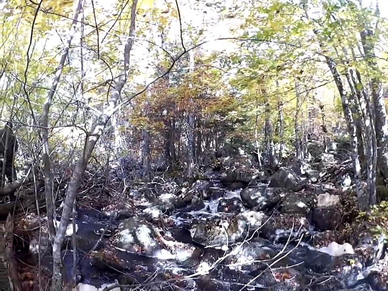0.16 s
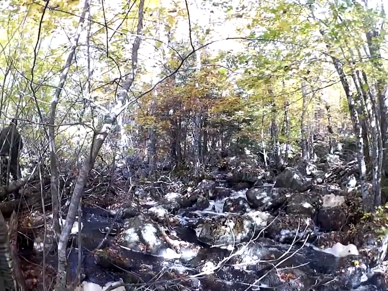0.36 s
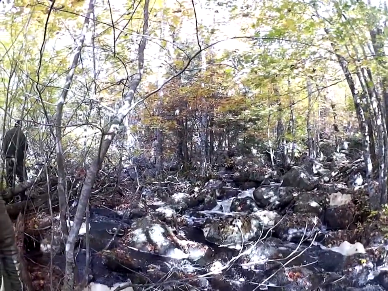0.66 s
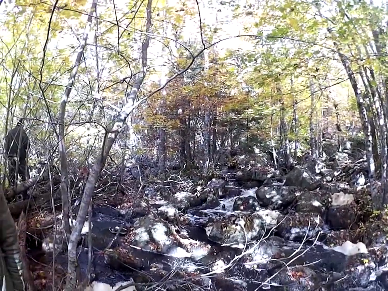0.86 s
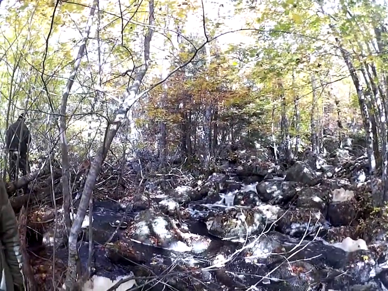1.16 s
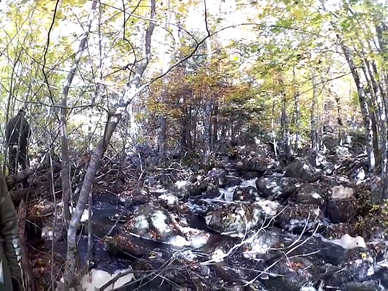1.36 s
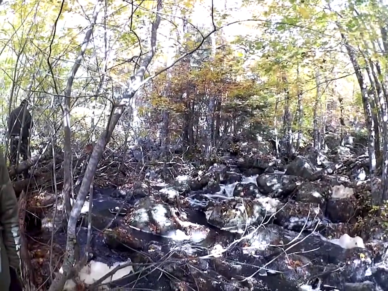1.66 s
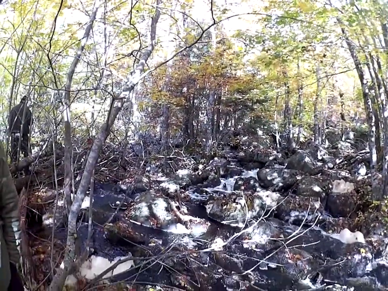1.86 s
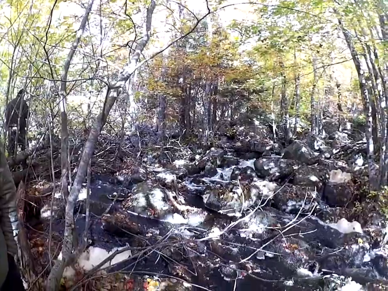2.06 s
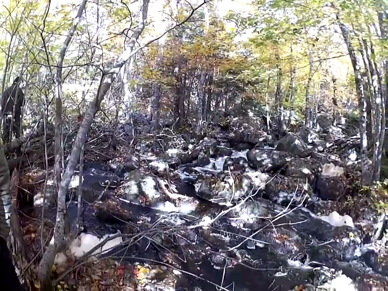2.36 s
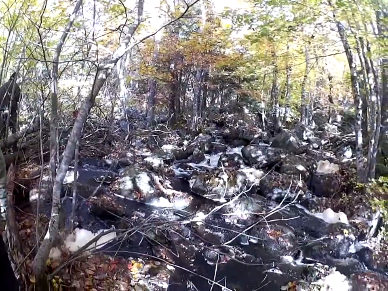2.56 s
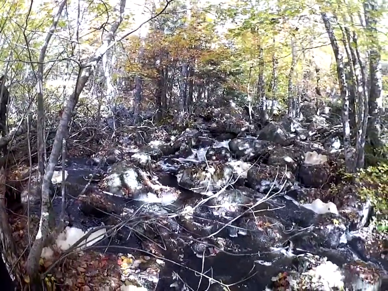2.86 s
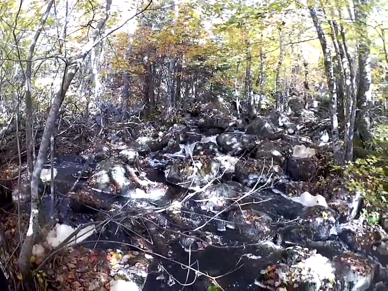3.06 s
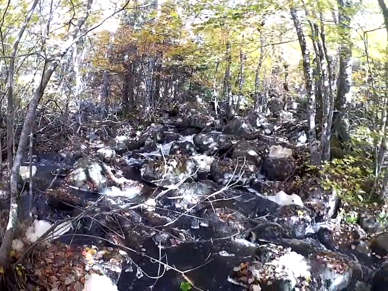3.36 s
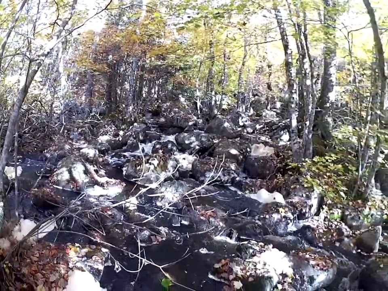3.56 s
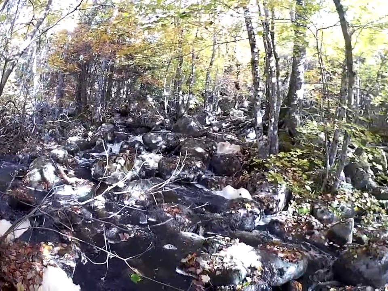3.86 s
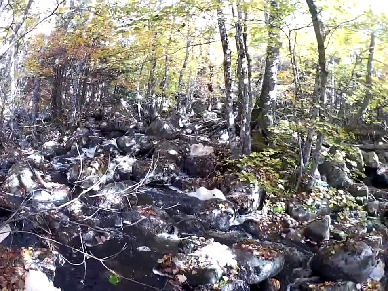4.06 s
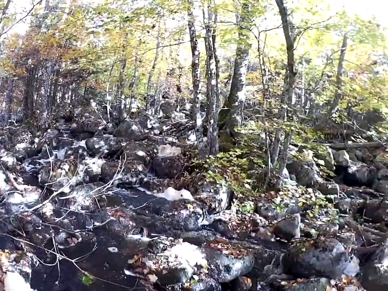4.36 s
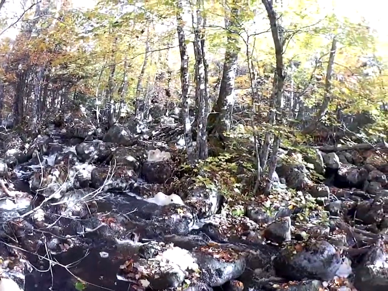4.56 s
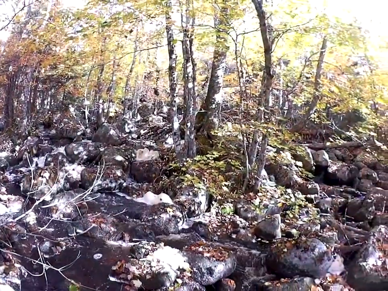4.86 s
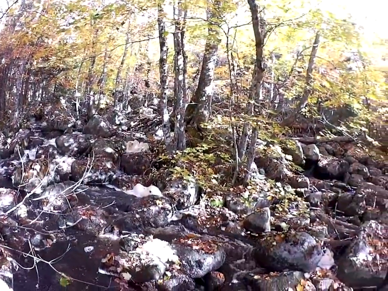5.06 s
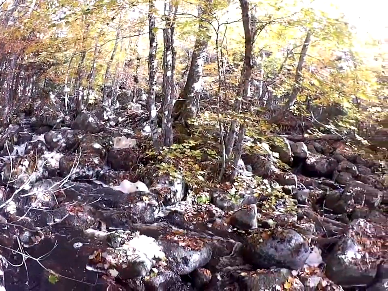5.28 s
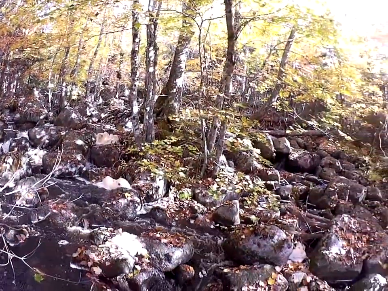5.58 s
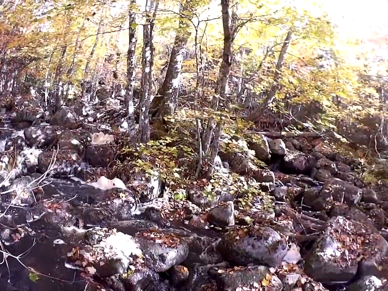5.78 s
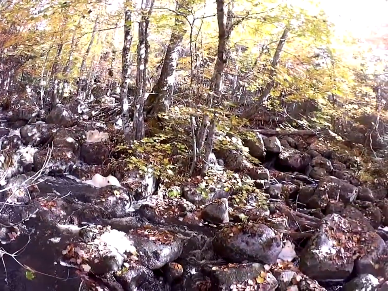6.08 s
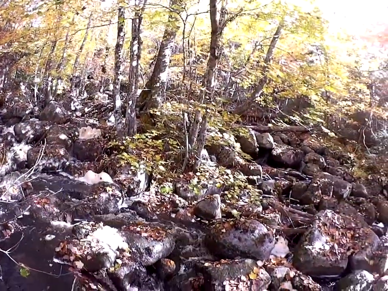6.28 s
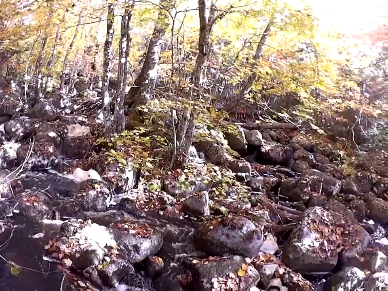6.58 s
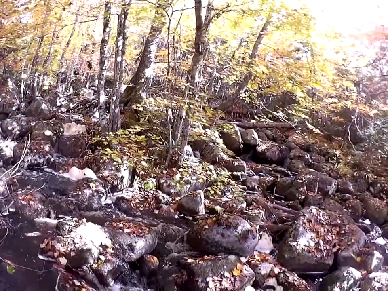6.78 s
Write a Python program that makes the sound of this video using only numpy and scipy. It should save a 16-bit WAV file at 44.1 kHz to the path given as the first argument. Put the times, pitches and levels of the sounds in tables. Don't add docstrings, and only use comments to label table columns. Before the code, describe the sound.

Unbroken watery rush outdoors, midrange-heavy and slightly boxy, with little deep rumble and softened top treble. It flickers quickly with crowded bubbles. Brief liquid plinks and lower plops scatter over it, more often in the second half. The closely spaced stereo pickup pans right past a boulder, briefly hollowing the lower rush; the cascade moves leftward. Nothing else is heard.

```python
import sys
import numpy as np
from scipy import signal
from scipy.fft import rfft, irfft, next_fast_len
from scipy.io import wavfile
from scipy.ndimage import map_coordinates

SR = 44100
rng = np.random.default_rng(int(sys.argv[2]) if len(sys.argv) > 2 else 0)


def waveform_to_disk(signal):
    frames = np.transpose(np.atleast_2d(signal))
    scaled = np.clip(frames, -1, 1) * 32767
    samples = np.round(scaled).astype(np.int16)
    wavfile.write(sys.argv[1], SR, samples)


def voltage_ratio(level):
    return 10 ** (np.asarray(level, float) / 20)


N = 305172
PAD = next_fast_len(N + 8192)

# [bearing to the left of the main cascade/rad, level/dB]
FALLS = [(0, 0), (-.38, -3.5), (.47, -3.5), (-.9, -5.5), (1.05, -5.5), (-1.6, -8), (1.9, -8), (-2.4, -8),
         (2.8, -8)]
# [f/Hz, level per Hz/dB]
RUSH_COLOUR = [(30, -7), (70, -9), (250, -3.5), (500, -4.5), (1000, 1.6), (2300, -0.28), (3200, -5.),
               (4800, -15), (5700, -17), (7000, -10.5), (9000, -10), (10500, -11), (12000, -20.5),
               (14000, -28)]
# [t/s, peak level/dB, f/Hz]
SPLASHES = [(0.2663, -16, 2330), (1.0585, -14, 2427), (1.1957, -11, 2370), (3.043, -23, 2300),
            (3.1323, -14, 2120), (3.2954, -12, 2190), (3.7219, -19, 2153), (3.7755, -16, 2310),
            (3.889, -14, 2390), (4.1709, -15, 2420), (4.306, -17, 2100), (4.4526, -9.5, 1910),
            (4.5543, -18, 2400), (4.892, -18, 2470), (5.633, -14, 2264), (5.9389, -13.5, 2430),
            (6.0706, -16, 2124), (6.3016, -18, 2394), (6.4657, -15, 2440), (6.6488, -23, 2180)]
# [t/s, peak level/dB, f/Hz]
PLOPS = [(0.244, -18, 975), (0.424, -19, 1090), (2.277, -26.5, 1450), (2.84, -22.5, 1390),
         (3.394, -26, 1117), (3.906, -23.5, 1100), (4.132, -17, 1050), (4.869, -15, 1100),
         (5.441, -17, 1076), (5.545, -16, 1103), (6.03, -28, 430), (6.07, -21.5, 1090), (6.285, -16, 928),
         (6.379, -19.5, 1096)]
# [t/s, peak level/dB, f/Hz]
TICKS = [
    (.640, -37, 4800),
    (1.661, -49.5, 5000),
    (3.111, -36, 6500),
    (3.401, -35, 4000),
    (4.567, -45, 5500),
    (5.709, -40.5, 11500),
    (6.024, -42, 5500),
]
# [cavity f/Hz, cavity Q, duct f/Hz, duct Q, level/dB]
PORTS = [
    (2295, 6.0, 8330, 8.2, -0.9),
    (2400, 4.0, 9770, 3.6, 1.2),
]


def rms_one(x):
    return x / np.sqrt(np.mean(x ** 2) + 1e-20)


def drift(rate):
    radius = np.exp(-80 * np.pi * rate / SR)
    chance = rng.standard_normal(N // 40 + 2002)
    slow = signal.lfilter([1], [1, -2 * radius, radius * radius], chance)[2000:]
    return np.interp(np.arange(N) / 40, np.arange(len(slow)), rms_one(slow))


def glide(span_s):
    return np.interp(np.arange(N) / SR, span_s, [0, 1])


def through(x, response):
    hz = np.arange(PAD // 2 + 1) * SR / PAD + 1e-3
    return irfft(rfft(x, PAD) * response(hz), PAD)[..., :N]


def read_late(x, seconds):
    return map_coordinates(x, [np.arange(N) - seconds * SR], order=3, mode="mirror")


def arrive(sources):
    spacing_m, sound_speed = 0.034, 343
    shadow_db, left_lift_db, shadow_hz = [4.5, -0.3], 0.63, 700
    clear, shaded = np.zeros((2, 2, N))
    for right, bearing in sources:
        leftness = np.sin(bearing)
        left = read_late(right, -leftness * spacing_m / sound_speed)
        both = np.array([left, right])
        gain_db = np.outer(shadow_db, leftness) + [[left_lift_db], [0]]
        clear += both
        shaded += both * (voltage_ratio(gain_db) - 1)
    return clear + through(shaded, lambda hz: 1j * hz / (shadow_hz + 1j * hz))


def boulder_echo():
    passed_s, span_s = 4.4, 0.65
    near = np.exp(-((np.arange(N) / SR - passed_s) / span_s) ** 2)
    echo_ms = np.interp(near, [0, 1], (1.3, 0.8))
    return echo_ms, np.interp(near ** 0.5, [0, 1], (0.08, 0.55))


def rush_colour(hz):
    table_hz, db = np.transpose(RUSH_COLOUR)
    level = voltage_ratio(np.interp(np.log(hz), np.log(table_hz), db))
    cepstrum = irfft(np.log(level), PAD)
    cepstrum[1:PAD // 2] *= 2
    cepstrum[PAD // 2 + 1:] = 0
    return np.exp(rfft(cepstrum))


def hiss(kind):
    split = signal.butter(2, 3500, kind, fs=SR, output="sos")
    return signal.sosfilt(split, rng.standard_normal(N))


def ring(clicks, hz, cycles):
    radius, turn = voltage_ratio(-60 * hz / (cycles * SR)), 2 * np.pi * hz / SR
    return signal.lfilter([0, np.sin(turn)], [1, -2 * radius * np.cos(turn), radius * radius], clicks + 1e-18)


def fall(pitches_hz):
    surge = drift(14)
    low, high = hiss("low"), hiss("high")
    spray = low * voltage_ratio(1.5 * surge) + high * voltage_ratio(0.5 * surge + 2.6 * drift(55))
    born = rng.random(N) < 500 * voltage_ratio(3.0 * surge) / SR
    size_db = 3.35 * np.minimum(rng.exponential(1, N), 4.0)
    clicks = born * voltage_ratio(size_db) * rng.choice([-1, 1], N)
    dealt = rng.integers(0, len(pitches_hz), N)
    bubbles = np.zeros(N)
    for k, hz in enumerate(pitches_hz):
        bubbles += ring(clicks * (dealt == k), hz, cycles=5.9) * np.sqrt(hz)
    return rms_one(spray) + voltage_ratio(-12.0) * rms_one(bubbles)


def brook(bearing):
    pitches_hz = np.geomspace(450, 11000, 5 * len(FALLS)).reshape(5, -1).T
    falls = [(voltage_ratio(db) * fall(own_hz), bearing + offset) for (offset, db), own_hz in zip(FALLS, pitches_hz)]
    rush_db = -30.0 + 0.61 * glide((2.4, 3.2))
    rush = voltage_ratio(rush_db) * through(rms_one(arrive(falls)), rush_colour)
    echo_ms, echo_share = boulder_echo()
    dull = signal.sosfilt(signal.butter(2, 500, fs=SR, output="sos"), rush)
    return rush + echo_share * np.array([read_late(side, echo_ms / 1000) for side in dull])


def clear_treble(rush):
    corner_hz, gain_db = 6500, 1.5
    treble = through(rush, lambda hz: hz ** 4 / (hz ** 4 + corner_hz ** 4))
    return rush + (voltage_ratio(gain_db * glide((2.2, 4.7))) - 1) * treble


def drops(events, trim_db, cycles, swell):
    out = np.zeros(N)
    for s, db, hz in events:
        turns = np.arange(round(2 * cycles * SR / hz)) * hz / SR
        shape = (1 - np.exp(-turns / swell)) * voltage_ratio(-60 * turns / cycles)
        climb = 0.974 + 0.0036 * turns
        tone = shape / shape.max() * np.sin(2 * np.pi * turns * climb)
        at = round(s * SR)
        out[at:at + len(tone)] += voltage_ratio(db + trim_db) * tone[:N - at]
    return out


def cascade_drops():
    splashes = drops(SPLASHES, trim_db=-16.0, cycles=17.0, swell=1.36)
    plops = drops(PLOPS, trim_db=-9.5, cycles=7.6, swell=1.5)
    ticks = drops(TICKS, trim_db=4.5, cycles=7.0, swell=1.2)
    return splashes + plops + ticks


def scene():
    bearing = np.interp(glide((2.4, 6.0)), [0, 1], (-0.55, 0.45))
    rush = clear_treble(brook(bearing))
    return rush + arrive([(cascade_drops(), bearing)])


def ports(hz):
    notch_hz, notch_width_hz = 7942, 283
    cavity_hz, cavity_q, duct_hz, duct_q, db = np.transpose(PORTS)[:, :, None]
    cavity = 1 - (hz / cavity_hz) ** 2 + 1j * hz / cavity_hz / cavity_q
    duct = 1 - (hz / duct_hz) ** 2 + 1j * hz / duct_hz / duct_q
    off, width = notch_hz ** 2 - hz ** 2, 1j * hz * notch_width_hz
    branch = (off + 0.1 * width) / (off + width)
    return voltage_ratio(db) / cavity / duct * branch


def top_cut(x):
    return signal.sosfilt(signal.butter(12, 14400, fs=SR, output="sos"), x)


def record(dry):
    low_cut = signal.butter(4, 109.6, "high", fs=SR, output="sos")
    mix = signal.sosfilt(low_cut, through(dry, ports))
    return top_cut(mix)


dry = scene()
out = record(dry)
waveform_to_disk(out)
```